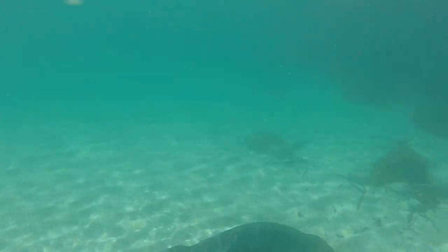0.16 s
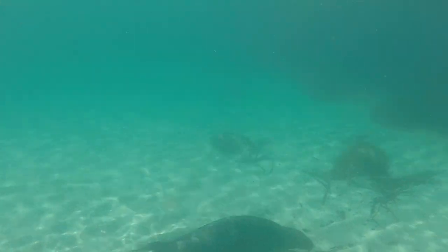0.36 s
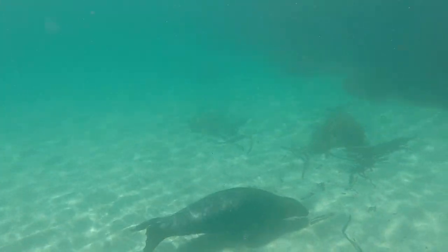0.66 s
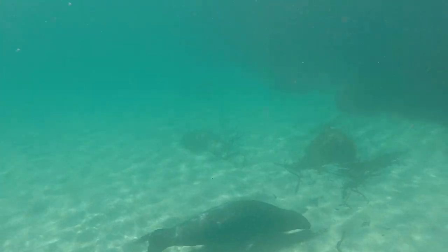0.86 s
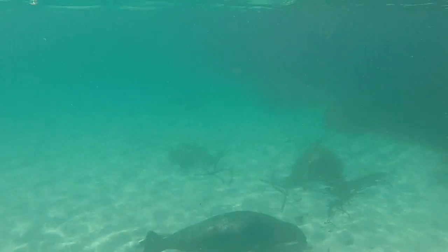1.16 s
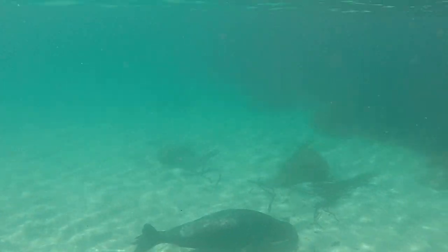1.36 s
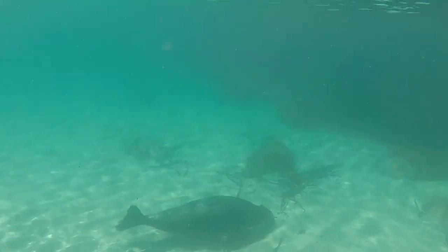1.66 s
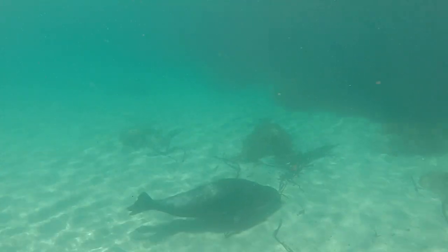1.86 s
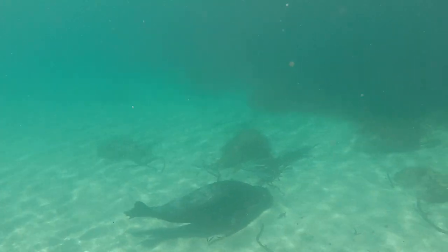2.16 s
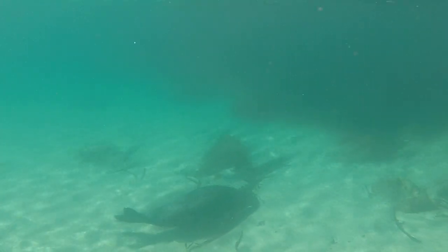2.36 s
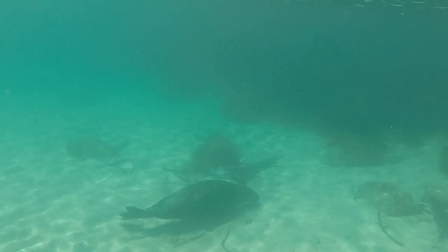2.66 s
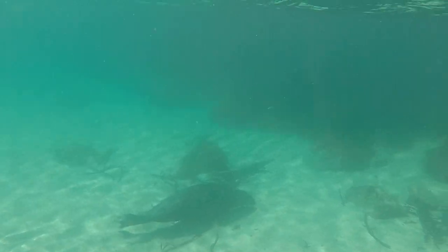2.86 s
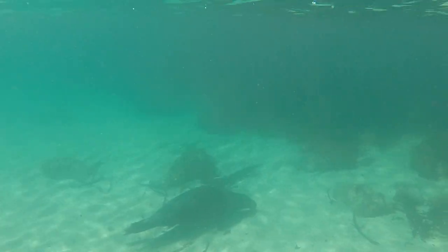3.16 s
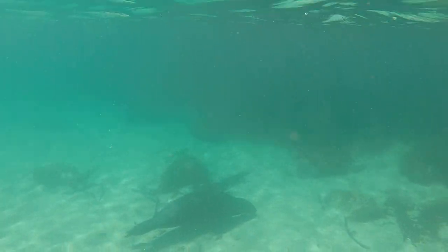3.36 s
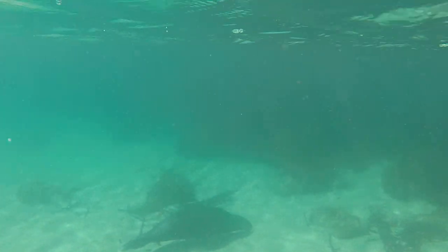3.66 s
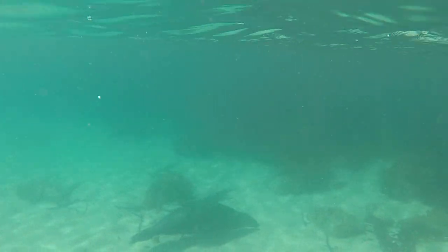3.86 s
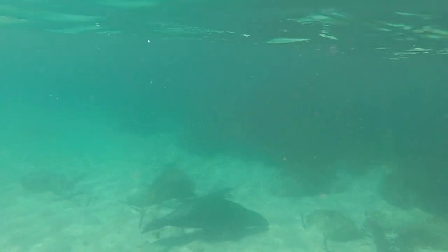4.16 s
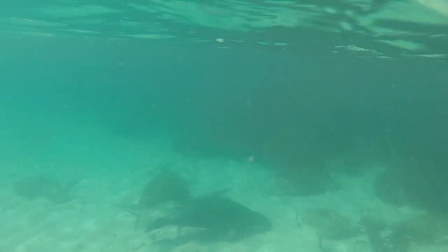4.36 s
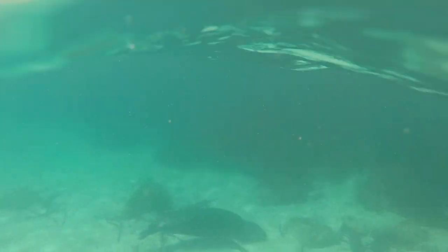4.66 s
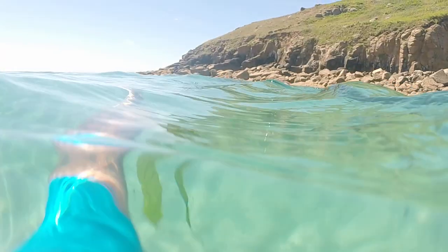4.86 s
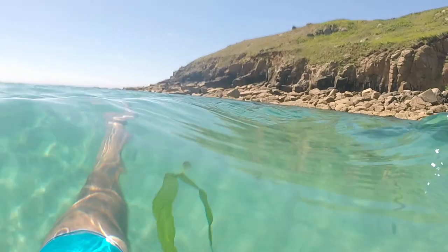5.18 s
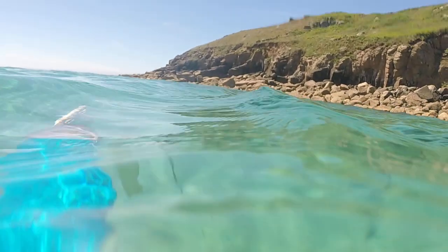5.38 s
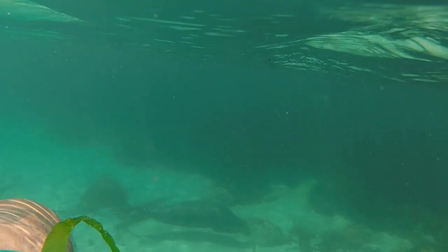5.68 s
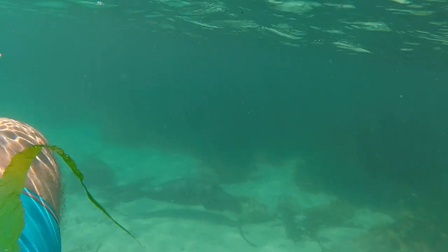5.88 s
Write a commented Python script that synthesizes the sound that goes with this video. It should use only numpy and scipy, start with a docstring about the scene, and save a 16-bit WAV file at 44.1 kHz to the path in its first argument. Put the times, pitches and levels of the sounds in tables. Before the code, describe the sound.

Shallow sea water rumbles softly around a submerged camera while close clicks, taps and knocks come in two bursts and scattered hits.

```python
"""A camera in a waterproof housing is held just under the surface of shallow sea water. Moving water rumbles
softly throughout, with a faint hiss and a few tiny ticks. Near the start, a burst of knocks and clicks sounds
through the housing, which rings on, and bubbles pop. Scattered taps follow, stronger at about 1.7 and 3.5
seconds. From about 5.5 seconds a quick cluster of knocks comes as the camera dips back under, and the rumble
swells."""
import sys
import numpy as np
from scipy import signal
from scipy.fft import rfft, irfft
from scipy.io import wavfile

SR = 44100
rng = np.random.default_rng(int(sys.argv[2]) if len(sys.argv) > 2 else 0)


def unload_wav(signal):
    """Save mono or channel-first audio to the path in sys.argv[1] as 16-bit WAV at rate SR, clipped to [-1, 1]."""
    wavfile.write(
        sys.argv[1],
        SR,
        np.round(np.clip(np.atleast_2d(signal).T, -1, 1) * 32767).astype(np.int16),
    )


N = 265631
EVENT_SAMPLES = 4096  # room for one short sound to die away


def from_db(db):
    """Turn decibels into a number to multiply a sound by."""
    return 10 ** (np.asarray(db) / 20)


def peak_one(sound):
    """Scale a sound so that its peak is 1."""
    return sound / np.abs(sound).max()


def band(sound, hz, kind, order=2):
    """Keep the "low" pitches, the "high" ones or a "band" between two."""
    return signal.sosfilt(signal.butter(order, np.clip(hz, 10, .45 * SR), kind, fs=SR, output="sos"), sound)


def add(track, start_s, sound):
    """Mix a sound into the track at its start time."""
    start = round(start_s * SR)
    part = sound[:max(N - start, 0)]
    track[start:start + len(part)] += part


def blow():
    """The shortest possible hit: one sample, holding every pitch."""
    return signal.unit_impulse(EVENT_SAMPLES) + 1e-18


def echoes(sound, level_db, fade_s, low_hz):
    """A dense tail of reflections, new each time; it falls 60 dB in fade_s."""
    t = np.arange(EVENT_SAMPLES) / SR
    tail = rng.standard_normal(len(t)) * from_db(-60 * t / fade_s) * (t > .0004)
    tail = band(tail, low_hz, "high")
    return from_db(level_db) * signal.fftconvolve(sound, tail / np.linalg.norm(tail))[:len(t)]


def water(steady_db=-54, rumble_hz=350, waver_db=2.0):
    """A smooth hiss over a rumble that swells as water flows round the housing."""
    # how strong the steady noise is from bass to treble: pitch_hz, relative_level_db
    tone_shape = [(12, -28), (20, 5), (45, -10), (81, -15), (234, -19.5), (277, -22), (328, -21.5),
                  (542, -24.5), (590, -25), (873, -27.5), (1220, -29), (4420, -38.5), (14300, -53.5),
                  (16000, -65.5)]
    # how the flow raises and lowers the rumble: time_s, boost_db
    flow = [(0.0, 2), (4.2, 2), (4.8, 0), (5.4, -1.5), (6.02, 6)]
    pitch_hz, level_db = np.transpose(tone_shape)
    gains = from_db(np.interp(np.log(np.fft.rfftfreq(N, 1 / SR) + 1), np.log(pitch_hz), level_db))
    noise = irfft(rfft(rng.standard_normal(N)) * gains, N)
    noise = band(noise, 28.7, "high")
    noise *= from_db(steady_db) / noise.std()
    rumble = band(noise, rumble_hz, "low", order=1)
    t = np.arange(N) / SR
    eddies = np.interp(t, np.linspace(0, t[-1], 70), rng.standard_normal(70))
    swell_db = np.interp(t, *np.transpose(flow)) + waver_db * eddies
    return noise + rumble * (from_db(swell_db) - 1)


def ticks(faint_per_s=5, faint_db=-59, spread_db=4):
    """A few far-off snaps stand out; fainter ones come at random."""
    # the snaps that stand out: start_s, level_db
    clear_snaps = [(1.1475, -44), (1.2965, -44), (3.527, -46.5), (3.8374, -41), (5.0348, -48)]
    faint_snaps = [(when * N / SR, faint_db + spread_db * size)
                   for when, size in rng.random((int(faint_per_s * N / SR), 2))]
    snap = peak_one(band(blow(), [2000, 7500], "band"))
    track = np.zeros(N)
    for start_s, level_db in clear_snaps + faint_snaps:
        tail = echoes(snap, level_db=2.0, fade_s=.008, low_hz=1500)
        add(track, start_s, from_db(level_db) * (snap + tail))
    return track


def fading_note(pitch_hz, fade_s, swell_s=0.000067):
    """One fading note that has little bass under it, as from trapped air or the ringing housing."""
    t = np.arange(EVENT_SAMPLES) / SR
    loudness = from_db(-60 * t / fade_s) * (1 - np.exp(-t / swell_s))
    return band(loudness * np.sin(2 * np.pi * pitch_hz * t), .45 * pitch_hz, "high", order=1)


def ringing_notes(tiny_per_s=1.2, tiny_db=-56, low_hz=2760, high_hz=3600):
    """Each bubble, and the housing after some knocks, rings briefly. A few notes stand out; tiny bubbles come
    at random."""
    # the notes that stand out, from bubbles and from the housing set ringing by knocks: start_s, level_db,
    # pitch_hz
    clear_notes = [(0.3564, -12.5, 1850), (0.4327, -24.5, 950), (0.735, -25.5, 2490), (3.43, -30.5, 2800),
                   (3.4525, -18, 670), (3.472, -30.5, 4475), (3.473, -17, 1930), (3.865, -47.5, 2910),
                   (4.995, -48, 3220), (5.7824, -35, 1670), (5.9335, -25.5, 2940), (5.967, -33.5, 1970),
                   (6.011, -32, 2170)]
    tiny_pops = [(when * N / SR, tiny_db, low_hz + smallness * (high_hz - low_hz))
                 for when, smallness in rng.random((int(tiny_per_s * N / SR), 2))]
    track = np.zeros(N)
    for start_s, level_db, pitch_hz in clear_notes + tiny_pops:
        add(track, start_s, from_db(level_db) * fading_note(pitch_hz, fade_s=0.021))
    return track


def shoves(pitch_hz=62, fade_s=0.044):
    """Heavy knocks shove the whole housing into a low swing that soon stops."""
    # the shoves: start_s, level_db
    pushes = [(0.353, -25.5), (0.381, -36), (1.685, -34), (5.633, -37.5), (5.8124, -22), (5.891, -38)]
    t = np.arange(EVENT_SAMPLES) / SR
    swing = peak_one(-np.sin(2 * np.pi * pitch_hz * t) * from_db(-60 * t / fade_s))
    track = np.zeros(N)
    for start_s, level_db in pushes:
        add(track, start_s, from_db(level_db) * swing)
    return track


def housing(sound):
    """The housing makes some pitches louder and swallows others."""
    # the pitches it lifts or lowers: pitch_hz, width_hz, boost_db
    resonances = [(497, 480, -1.5), (690, 150, 11), (1120, 200, -2.5), (1754, 88, 6), (2449, 460, 5),
                  (3092, 280, 3.5), (4950, 500, 0), (7450, 600, 4.5), (9946, 2000, 2)]
    for pitch_hz, width_hz, boost_db in resonances:
        angle = 2 * np.pi * pitch_hz / SR
        damping = np.sin(angle) * width_hz / pitch_hz / 2
        lift, cut = damping * max(from_db(boost_db), 1), damping * max(from_db(-boost_db), 1)
        tuning = -2 * np.cos(angle)
        sound = signal.lfilter([1 + lift, tuning, 1 - lift], [1 + cut, tuning, 1 - cut], sound + 1e-18)
    return sound


def flexing_wall(sound, turn_hz):
    """A bending wall passes low pitches later than high ones, at the same level."""
    angle = 2 * np.pi * turn_hz / SR
    weights = [1 + np.sin(angle) / 2, -2 * np.cos(angle), 1 - np.sin(angle) / 2]
    return signal.lfilter(weights[::-1], weights, sound)


def housing_ring(pitch_hz, swell_s):
    """The struck housing gives a note that swells for swell_s, then dies."""
    t = np.arange(EVENT_SAMPLES) / SR
    loudness = t / swell_s * np.exp(1 - t / swell_s)
    return band(loudness * np.sin(2 * np.pi * pitch_hz * t), pitch_hz / 3.6, "high")


def contact_crack(top_hz):
    """The sharp edge of sound at the moment of contact."""
    return peak_one(band(blow(), [1500, top_hz], "band"))


def strike(ring, crack, thud, bounce_chance=.6, bounce_db=-17, soonest_s=0.0024, latest_s=.011):
    """One hit may bounce once; it rattles round the housing, and the water returns a dull tail."""
    luck, lateness = rng.random(2)
    bounce_samples = round((soonest_s + lateness * (latest_s - soonest_s)) * SR)
    if luck < bounce_chance:
        crack = crack + from_db(bounce_db) * np.roll(crack, bounce_samples)
    direct = ring + crack + thud
    rattle = echoes(crack, level_db=-2, fade_s=0.0055, low_hz=1180)
    rattle += echoes(ring, level_db=-11, fade_s=0.0065, low_hz=1210)
    rattle += echoes(thud, level_db=-3, fade_s=0.024, low_hz=1085)
    water_tail = band(echoes(direct, level_db=-25, fade_s=0.075, low_hz=500), 3500, "low")
    return direct + rattle + water_tail


def clicks(swell_cycles=0.98, crack_db=-0.5):
    """A touch too light for a thud gives a bright crack and a very short, high ring."""
    # light touches on the housing: start_s, level_db, pitch_hz
    touches = [(0.359, -31, 9250), (0.412, -32, 2380), (0.4228, -25, 2000), (0.5057, -35, 6500),
               (0.5135, -14, 8600), (0.5199, -13.5, 8316), (1.733, -30, 2025), (1.735, -24, 3160),
               (2.0869, -34, 1900), (2.6074, -17.5, 10230), (3.1257, -35, 5700), (3.1304, -37, 2870),
               (3.4525, -8, 7920), (3.468, -14, 9450), (5.791, -32, 13000), (5.8068, -23, 12100),
               (5.8151, -13.5, 5640), (5.9162, -27.5, 12000), (5.9333, -15, 6600), (5.9434, -22, 9100)]
    crack = from_db(crack_db) * contact_crack(top_hz=10100)
    track = np.zeros(N)
    for start_s, level_db, pitch_hz in touches:
        ring = housing_ring(pitch_hz, swell_s=swell_cycles / pitch_hz)
        add(track, start_s, from_db(level_db) * strike(ring, crack, thud=np.zeros(EVENT_SAMPLES)))
    return track


def air_inside(spread_db=1.5, pitch_spread=0.056):
    """A thud sets the air in the housing ringing, a little differently each time."""
    # the notes of that air: pitch_hz, level_db (compared with the thud), fade_s
    air_notes = [(660, -19, 0.018), (980, -15.5, 0.02), (1791, -27, .035), (2520, -18.5, .014)]
    air = np.zeros(EVENT_SAMPLES)
    for pitch_hz, level_db, fade_s in air_notes:
        louder, higher = rng.standard_normal(2)
        note = fading_note(pitch_hz * (1 + pitch_spread * higher), fade_s)
        air += from_db(level_db + spread_db * louder) * note
    return air


def knocks(base_swell_s=.00045, swell_growth=0.17):
    """Each knock on the housing is a sharp crack, a short ring and a dull thud."""
    # the knocks: start_s, ring_db, pitch_hz, thud_db, crack_db
    hits = [(0.3553, -5.5, 1990, -21, -50), (0.3807, -5, 2640, -23, -16.5), (0.419, -12, 2970, -29, -12.5),
            (0.4327, -15.5, 2580, -27, -42), (0.4626, -30.5, 1210, -30.5, -62),
            (0.6713, -23.5, 6420, -31, -25), (0.7187, -31, 1760, -62, -33), (0.7353, -35.5, 1550, -53, -54),
            (1.686, -18, 890, -17.5, -18.5), (1.9254, -29.5, 10350, -42.5, -34.5),
            (3.4072, -32, 2372, -31.5, -25), (3.449, -30, 1410, -30.5, -17.5), (3.4518, -5, 1465, -53, -25),
            (4.4003, -31.5, 3170, -40, -36), (4.852, -27.5, 1887, -26.5, -41),
            (4.866, -29.5, 1380, -28.5, -60), (5.4644, -30, 1890, -31.5, -34.5),
            (5.491, -25, 2100, -23.5, -38), (5.5503, -22.5, 1950, -19, -31.5),
            (5.631, -18, 860, -10.5, -28), (5.6786, -32.5, 1500, -16.5, -33),
            (5.7642, -27, 5300, -56.5, -28.5), (5.8067, -26, 2100, -25.5, -23), (5.814, -14, 707, -13, -15),
            (5.832, -31, 5030, -26, -24), (5.8437, -20, 2180, -27.5, -5.5), (5.8785, -25, 2010, -47, -18.5),
            (5.888, -30, 1410, -12.5, -40), (5.924, -9, 1485, -31, -42), (5.9473, -29.5, 2400, -31, -23.5)]
    dull_blow = band(band(blow(), [60, 600], "band", order=1), 1500, "low", order=1)
    wall_push = flexing_wall(peak_one(dull_blow), turn_hz=827)
    track = np.zeros(N)
    for start_s, ring_db, pitch_hz, thud_db, crack_db in hits:
        swell_s = base_swell_s * from_db(swell_growth * ring_db)  # a harder knock rings longer
        ring = from_db(ring_db) * housing_ring(pitch_hz, swell_s)
        crack = from_db(crack_db) * contact_crack(top_hz=4470)
        thud = from_db(thud_db) * (wall_push + air_inside())
        add(track, start_s, strike(ring, crack, thud))
    return track


def scene():
    """Knocks, clicks and ticks pass through the housing; ringing notes, shoves and water join them."""
    through_housing = housing(knocks() + clicks() + ticks())
    return (through_housing + ringing_notes() + shoves() + water())[None]  # one channel


def record(dry, soften_hz=13000, cutoff_hz=15900):
    """Any peak past full scale is flattened; the highest treble is softened, then cut."""
    softened = band(np.clip(dry, -1, 1), soften_hz, "low")
    steep_cut = signal.ellip(10, .1, 80, cutoff_hz, fs=SR, output="sos")
    return signal.sosfilt(steep_cut, softened)


dry = scene()
out = record(dry)
unload_wav(out)
```